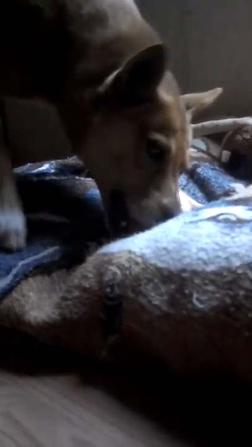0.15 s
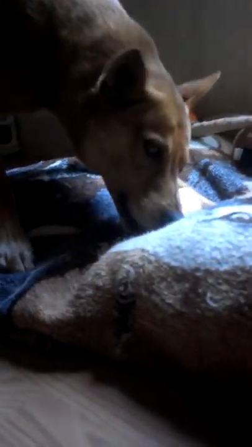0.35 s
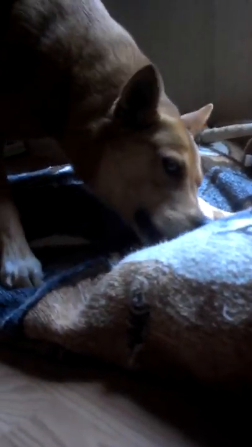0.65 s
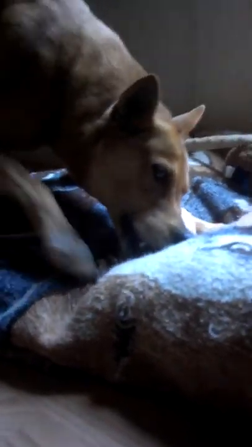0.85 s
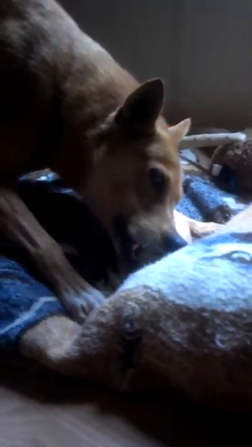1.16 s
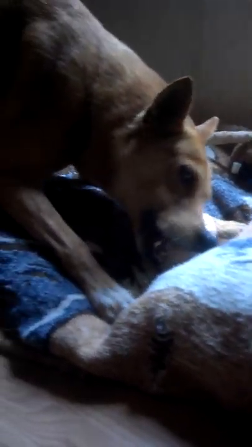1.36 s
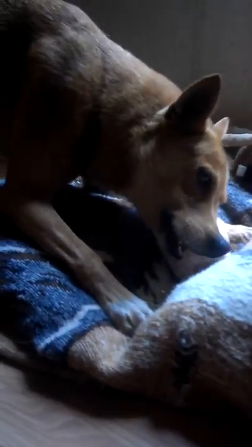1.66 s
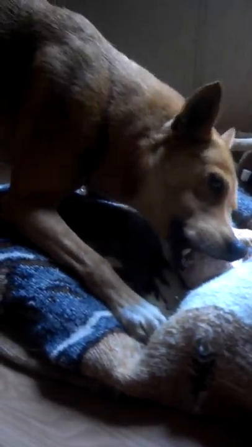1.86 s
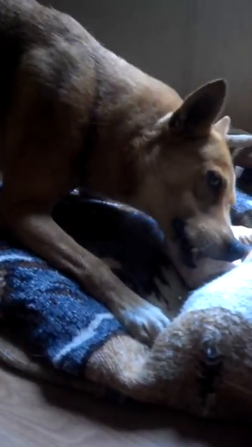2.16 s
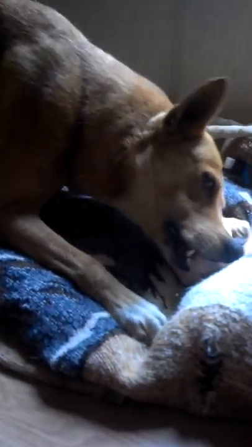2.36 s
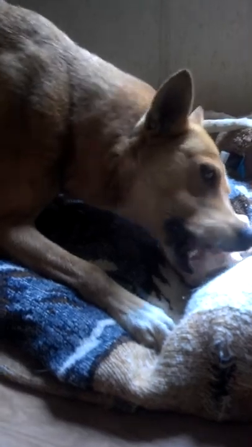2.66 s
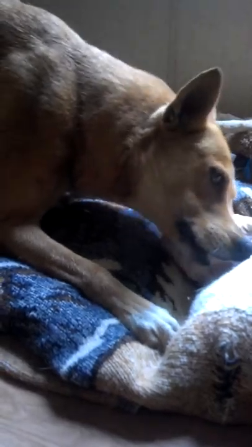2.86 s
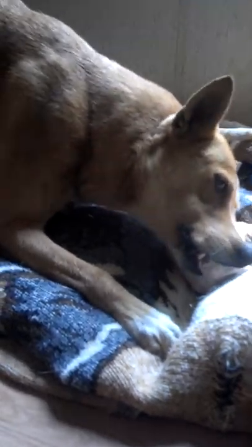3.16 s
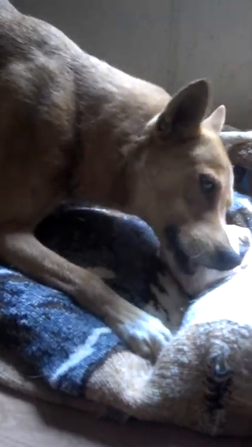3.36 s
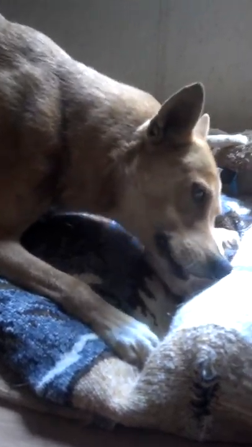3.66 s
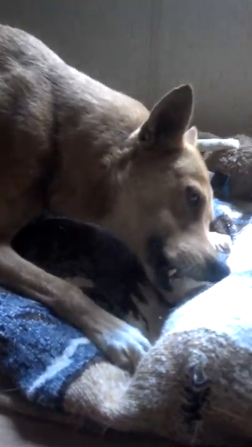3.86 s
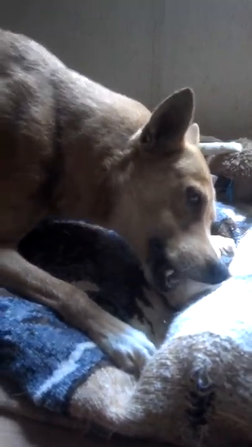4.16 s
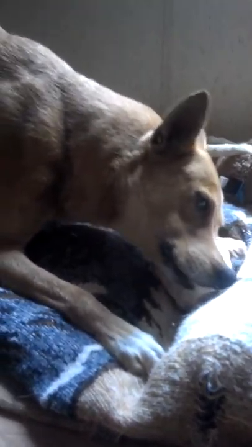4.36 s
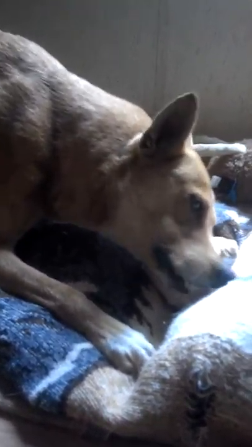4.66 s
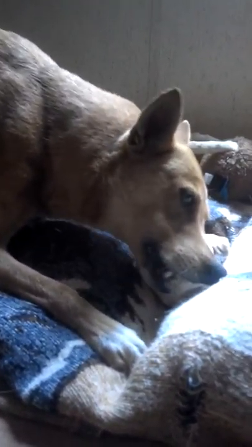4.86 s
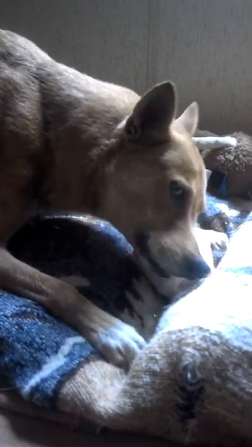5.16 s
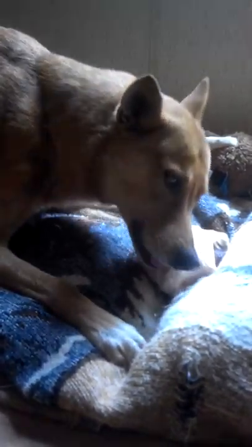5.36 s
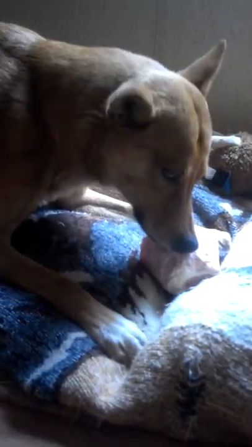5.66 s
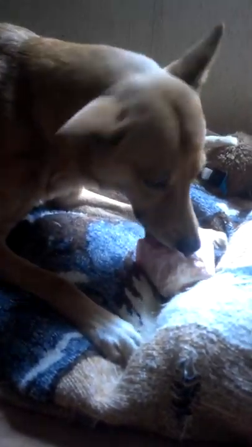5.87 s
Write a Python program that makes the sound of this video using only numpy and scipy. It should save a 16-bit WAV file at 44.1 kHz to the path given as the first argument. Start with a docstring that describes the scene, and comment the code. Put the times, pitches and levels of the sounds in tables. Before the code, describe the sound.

Sharp clicks and hollow knocks of a dog chewing a bone, with soft blanket rustling and an appliance humming in a quiet room.

```python
"""Under a dog's gnawing, a quiet room's steady rush runs throughout, with a humming appliance and
a rustling blanket. The dog chews a hard bone close to a small stereo recorder. Each bite is a burst
of tiny slips that knock the jaw, crack the bone and snap on the teeth. In between, the mouth
smacks, the teeth scrape and the lips part. When the loudest splinters snap off, a limiter
(an automatic volume control) turns everything down, then lets it creep back."""
import sys
import numpy as np
from scipy import signal
from scipy.fft import rfft, irfft
from scipy.io import wavfile
from scipy.ndimage import uniform_filter1d, minimum_filter1d

SR = 44100
rng = np.random.default_rng(int(sys.argv[2]) if len(sys.argv) > 2 else 0)


def wav_out(sig):
    """Save sig, one row per channel (or a flat mono array), as 16-bit PCM at SR to the path in sys.argv[1]."""
    wavfile.write(sys.argv[1], SR, np.round(np.clip(np.atleast_2d(sig).T, -1, 1) * 32767).astype(np.int16))


N = 265041
TIME, FREQS = np.arange(N) / SR, np.fft.rfftfreq(N, 1 / SR)

# steady rush and hiss of the room: (frequency [Hz], level [dB per Hz])
ROOM_RUSH = [(25, -104), (50, -90.5), (100, -75.5), (145, -68.5), (230, -71), (350, -75), (480, -75.5),
             (1100, -80), (2150, -87.5), (2750, -92.5), (4500, -89), (5800, -96.5), (7200, -84.5),
             (11000, -97.5), (16000, -100)]
# narrow bands of whirring noise: (pitch [Hz], width [Hz], level [dB])
WHIRRS = [(793, 47, -56), (1497, 30, -57), (578.4, 6.7, -58.5)]
# a low drone that swells, then fades: (time [s], level [dB])
DRONE_LEVELS = [(0, -56.5), (.6, -46), (1.4, -54), (2, -60), (6, -53)]
# tones of the mains hum: (pitch [Hz], level [dB])
MAINS_HUM = [(60, -73.5), (120, -46), (180, -53), (240, -57), (300, -60)]
# tone colour of rustling cloth: (frequency [Hz], gain [dB])
CLOTH_COLOUR = [(100, -51), (250, 3), (520, 7.5), (800, -4.5), (1400, -7), (2200, -2.5), (4000, -15.5),
                (9000, -26), (16000, -32)]
# the muzzle shoves into the cloth: (peak time [s], pitch [Hz], level [dB])
MUZZLE_SHOVES = [(.12, 440, -43.5), (.25, 425, -42.5), (.441, 436, -40), (.929, 430, -59), (3.04, 740, -42),
                 (3.14, 710, -39.5), (4.996, 580, -43), (5.302, 560, -46), (5.935, 495, -41.5)]
# teeth catch on the bone: (time [s], slip length [ms], knock level [dB], knock pitch [Hz],
# crack level [dB], crack pitch [Hz], snap level [dB], snap pitch [Hz])
TOOTH_CATCHES = [(0.057, .8, -54, 1050, -41.5, 3660, -49, 7500),
                 (0.8665, 1.8, -39, 1090, -37.5, 3120, -52, 7300),
                 (0.913, 0.52, -40, 1010, -51, 3400, -55, 7500),
                 (1.3052, 0.54, -45, 960, -40, 3500, -50, 7600),
                 (1.309, 1.3, -41, 690, -53, 3460, -43, 7900),
                 (1.314, 1.3, -44, 1040, -39, 3400, -45, 8400),
                 (1.3477, .5, -34.5, 1090, -42.5, 3280, -48, 7600),
                 (1.411, 1.5, -56, 1100, -44.5, 4000, -50, 7500),
                 (1.5717, 0.62, -18.5, 835, -31, 3660, -36.5, 7850),
                 (1.5827, 1.37, -18.5, 800, -28, 4250, -29, 7700),
                 (1.7523, .6, -57, 1100, -62, 3500, -40, 7900),
                 (1.762, 1.25, -40.5, 1150, -35.5, 3250, -40, 8200),
                 (1.767, 2.4, -49, 1190, -36, 3270, -32.5, 8000),
                 (1.795, .8, -35.5, 1040, -58, 3300, -58, 7500),
                 (1.862, 1.1, -61, 820, -63, 3600, -43, 7500),
                 (1.9595, 2.5, -35, 830, -44, 3920, -39, 7500),
                 (1.9625, 8.1, -22.5, 809, -31, 3840, -31.5, 7400),
                 (2.171, 2.9, -58, 855, -45, 4400, -40, 7900),
                 (2.182, 2.2, -64, 1255, -45, 3570, -35, 7100),
                 (2.1841, 1.4, -32.5, 1390, -34, 3670, -33, 6100),
                 (2.3543, .6, -33, 810, -43, 3600, -58, 7740),
                 (2.3618, 1.5, -40, 1150, -48, 3600, -47, 7800),
                 (2.3676, 0.92, -19, 1190, -34, 3580, -33, 8240),
                 (2.3781, 4.4, -25.5, 1470, -31, 3470, -31.5, 7850),
                 (2.3825, 5.8, -23.5, 813, -41, 3570, -35.5, 7800),
                 (2.585, 3.8, -41, 1150, -37.5, 4140, -36, 7950),
                 (2.5907, 0.63, -37.5, 1100, -48, 3400, -43, 7950),
                 (2.7335, 7.8, -31.5, 742, -43, 3540, -35.5, 7300),
                 (2.7375, 1.4, -36.5, 1400, -43, 3600, -45, 7260),
                 (3.1562, 1.4, -28, 777, -40.5, 3500, -36, 7600),
                 (3.1584, 5.2, -35.5, 1635, -33, 3500, -28, 8200),
                 (3.3927, 3.9, -45, 1100, -39, 4220, -37, 8400),
                 (3.529, 9.9, -31, 726, -37.5, 3650, -35.5, 8300),
                 (3.541, 1.2, -28.5, 740, -47, 3600, -36, 7750),
                 (3.5418, 3.5, -34, 1350, -40, 3600, -33.5, 7760),
                 (3.558, 0.8, -51, 1260, -38.5, 3000, -37, 6960),
                 (3.7535, 1.1, -47, 1050, -43, 3760, -36.5, 7000),
                 (3.761, 3.3, -40, 1080, -42, 3320, -49, 7500),
                 (3.9155, 7, -28.5, 748, -44.5, 3450, -43, 8200),
                 (4.2718, 1.6, -32, 780, -51, 3500, -49, 8100),
                 (4.274, 1.6, -40, 990, -43, 3480, -42.5, 8100),
                 (4.4955, 3.1, -55, 1200, -46, 3970, -33, 8700),
                 (4.4983, 2.1, -38, 1170, -63, 3900, -61, 8400),
                 (4.609, 6.4, -33, 810, -39, 3470, -41.5, 7200),
                 (4.6147, .8, -40, 1050, -59, 3500, -53, 7200), (4.701, 2, -46, 785, -58, 3500, -42, 7800),
                 (4.835, 1.5, -55, 1400, -52, 4120, -47, 6800),
                 (4.85, 3.2, -46, 1710, -56, 3300, -52, 8400),
                 (4.881, 2.7, -51, 1300, -56, 3300, -42, 7240),
                 (4.8945, 0.92, -40, 1140, -50, 3080, -45, 8300),
                 (5.4206, 1.5, -48, 1090, -41, 2960, -37, 7300),
                 (5.4235, 4.5, -54, 1210, -42.5, 3020, -38.5, 7600)]
# extra notes of the cracking bone: (pitch [Hz], width [Hz], level against the main note [dB])
BONE_NOTES = [(1603, 260, -5), (2005, 50, -9), (3470, 98, -18), (4440, 1300, -14.5)]
# splinters break off: (time [s], crack level [dB], snap level [dB], snap pitch [Hz])
SPLINTER_BREAKS = [(1.582, -30, -23.5, 7900), (2.1735, -51, -40, 8200), (2.1843, -29, -24.5, 7500),
                   (2.3788, -37, -34, 8300), (3.541, -38, -33.5, 7600), (3.9193, -42, -42, 8000),
                   (4.188, -51, -47, 9500), (4.4971, -39, -32.5, 8400), (4.8948, -48, -40, 8300),
                   (5.4207, -45, -42, 8000)]
# teeth drag along the bone: (peak time [s], pitch [Hz], level [dB])
TOOTH_SCRAPES = [(2.425, 8500, -44), (3.57, 3200, -52), (3.815, 7400, -49.5), (4.125, 7340, -49),
                 (4.885, 1920, -53), (5.45, 3120, -52), (5.94, 3640, -53), (5.945, 7540, -49.5)]
# bubbles burst as wet lips part: (time [s], pitch [Hz], level [dB])
LIP_BUBBLES = [(2.957, 6430, -39.5), (4.188, 7100, -49), (4.425, 4450, -46.5), (4.702, 8000, -35),
               (4.836, 6600, -34.5), (4.849, 8400, -42), (4.876, 6600, -38.5)]
# how long the room echoes: (frequency [Hz], time to fade by 60 dB [s])
ROOM_DECAY = [(200, 0.083), (850, 0.19), (2000, 0.36), (8000, 0.33), (15000, 0.058)]
# the two microphone openings, or ports: (frequency [Hz], likeness [0-1], left lead [radians])
MIC_PORTS = [(131, 1, 1.73), (262, 0.92, 1.5), (370, 0.7, 1.6), (545, 0.66, 0.07), (825, 0.84, 0.64),
             (1330, 1, -1), (1650, 0.68, -1.1), (2075, 0.72, -2), (2330, 1, -3.05), (2580, 1, -3.2),
             (2800, .45, -4.2), (3280, 0.97, -5.5), (3830, 1, -5.5), (4200, 0.4, -8), (4780, 0.83, -9.5),
             (5570, 0, -10), (7160, 1, -14.5), (8120, 0.58, -19), (10200, 0.18, -15.5), (13200, 0.1, -20.5)]
# level difference between the ports: (frequency [Hz], left minus right [dB])
PORT_BALANCE = [(120, -3), (300, 1), (900, 0.5), (1400, -0.5), (1750, -1), (2330, 0), (2600, 0), (3500, -1),
                (4400, -2), (6000, -0.5), (8000, 3.5), (12500, -2.5)]

APPROACH_S = .008  # a tooth touches the bone this long before it catches
GRIP_SHARE = 0.76  # the tooth keeps its grip for this share of a slip


def amp(db):
    """Turns decibels into a multiplier."""
    return 10 ** (np.asarray(db) / 20)


def unit(x):
    """Scales a sound to an average (rms) level of 1."""
    return x / np.sqrt(np.mean(x ** 2) + 1e-20)


def read(points, hz, column=1):
    """Reads between a table's rows on a log-frequency axis."""
    table = np.array(points, float)
    return np.interp(np.log(hz + 1), np.log(table[:, 0] + 1), table[:, column])


def add(mix, start_s, sound):
    """Adds a sound into the mix at a given time."""
    part = mix[..., round(start_s * SR):][..., :sound.shape[-1]]
    part += sound[..., :part.shape[-1]]


def colour(x, points):
    """Turns each frequency up or down as a table says."""
    return irfft(rfft(x) * amp(read(points, FREQS)), N)


def ring(x, hz, width_hz):
    """One resonance: the narrower it is, the longer it rings."""
    return signal.lfilter(*signal.iirpeak(hz, hz / width_hz, SR), x)


def double_ring(x, hz, width_hz, widen=2):
    """A resonance, then a wider one that trims its edges."""
    return ring(ring(x, hz, width_hz), hz, widen * width_hz)


def drift(per_s):
    """A slow random wobble of size 1."""
    return unit(irfft(rfft(rng.standard_normal(N)) * np.exp(-(FREQS / per_s) ** 2), N))


def burst(x, db):
    """Scales a short sound to a level taken over 5 ms."""
    return amp(db) * x / np.sqrt(np.mean(np.sum(x ** 2, -1)) / (SR / 200) + 1e-20)


def strokes(rows, length_s, width_share, grain_db):
    """Short swells of grainy rubbing, each around one pitch."""
    out, swell = np.zeros((2, N)), signal.windows.hann(round(length_s * SR))
    for s, hz, db in rows:
        grains = rng.standard_normal((2, SR // 2)) * amp(grain_db * rng.standard_normal(SR // 2))
        rubbed = unit(double_ring(grains, hz, width_share * hz))
        add(out, max(s - length_s / 2, 0), amp(db) * swell * rubbed[:, :len(swell)])
    return out


def appliance(drone_hz=259, drone_width_hz=14):
    """An appliance whirrs, drones and hums over the room's rush."""
    out = colour(rng.standard_normal((2, N)) * np.sqrt(SR / 2), ROOM_RUSH)
    for hz, width, db in WHIRRS:
        out += amp(db) * unit(ring(rng.standard_normal((2, N)), hz, width))
    drone = double_ring(rng.standard_normal((2, N)), drone_hz, drone_width_hz)
    out += unit(drone) * amp(np.interp(TIME, *np.transpose(DRONE_LEVELS)))
    for hz, db in MAINS_HUM:
        out[0] += amp(db) * np.sqrt(2) * np.sin(2 * np.pi * (hz * TIME + rng.random()))
    return out


def blanket(rub_db=-49.5, sway_db=0.46, flutter_db=3.5):
    """Fibres catch and let go under muzzle and paws; each shove gives a soft hollow swell."""
    rub = amp(rub_db + sway_db * drift(3) + flutter_db * drift(25))
    rustle = unit(colour(rng.standard_normal((2, N)), CLOTH_COLOUR))
    return rustle * rub + strokes(MUZZLE_SHOVES, length_s=.12, width_share=0.74, grain_db=2.0)


def smacks(per_s=70, level_db=-62, spread_db=4, pitches=8):
    """Films of saliva burst as faint ticks of many pitches."""
    out = np.zeros((2, N))
    for hz in np.geomspace(1300, 9000, pitches):
        pops = rng.random(N) < per_s / pitches / SR
        sizes = amp(spread_db * np.minimum(rng.exponential(1, N), 2))
        out += unit(ring(pops * sizes * rng.choice([-1, 1], (2, N)), hz, 0.11 * hz))
    return amp(level_db) * unit(out)


def gnawing():
    """Each catch of a tooth gives a low knock and a bright crunch."""
    knocks, crunches = np.zeros(N), np.zeros((2, N))
    for s, length_ms, knock_db, knock_hz, *crack_and_snap in TOOTH_CATCHES:
        add(knocks, s, knock(length_ms, knock_db, knock_hz))
        add(crunches, s - APPROACH_S, crunch(length_ms, *crack_and_snap))
    return knocks, crunches


def crunch(length_ms, crack_db, crack_hz, snap_db, snap_hz,
           drag_db=-13, drag_ms=3, fade_ms=0.96, crumble_db=-19, crumble_ms=5, tick_db=-17):
    """Grit breaks under the tooth: the bone cracks and the tooth's hard enamel snaps."""
    ms = (np.arange(2560) / SR - APPROACH_S) * 1000
    # the tooth drags lightly, grips and lets go; crumbs break off just after
    drag = amp(drag_db) * np.exp(np.minimum(ms, 0) / drag_ms)
    grip = np.maximum(np.clip(ms / (0.25 * length_ms), 0, 1), drag)
    after_ms = np.maximum(ms - GRIP_SHARE * length_ms, 0)
    release = np.exp(-after_ms / fade_ms) + amp(crumble_db) * np.exp(-after_ms / crumble_ms)
    grains = rng.standard_normal((2, len(ms))) * amp(2.8 * rng.standard_normal(len(ms)))
    grit = grip * release * grains
    notes = [(crack_hz, 1100, 0), *BONE_NOTES]
    crack = sum(burst(double_ring(grit, hz, width, widen=3), crack_db + db) for hz, width, db in notes)
    # enamel gives a bright ping and a tick far above it
    ping = double_ring(grit, snap_hz, width_hz=2800)
    tick = ring(np.diff(grit, prepend=0), hz=13500, width_hz=6000)
    return crack + burst(ping + amp(tick_db) * tick, snap_db)


def knock(length_ms, db, hz, spread_db=3, thud_db=-7, flesh_hz=1750, bass_cut_hz=520):
    """A tooth sticks and slips in step with the ringing jaw and bone, building a hollow note."""
    t = np.arange(2048) / SR
    gripping = t * 1000 <= GRIP_SHARE * length_ms
    slips = np.diff(np.floor(hz * t), prepend=-1) * gripping  # one per cycle
    slips *= amp(spread_db * rng.standard_normal(len(t)))
    # flesh softens each slip, and so small a body gives little bass
    thud = signal.lfilter(*signal.butter(4, flesh_hz, fs=SR), -slips)
    thud = signal.lfilter(*signal.butter(2, bass_cut_hz, "highpass", fs=SR), thud)
    note = ring(thud, hz, width_hz=135 * (hz / 850) ** 4.2)  # higher notes die sooner
    return burst(unit(note) + amp(thud_db) * unit(thud), db)


def hollow_ring(hz=836, fade_s=.29, rise_s=.006, ring_db=-12.5, reach_hz=40):
    """A knock close to the pitch of the hollow bone sets it ringing on."""
    t, energy = np.arange(SR // 4) / SR, np.zeros(N)
    fade, rise = amp(-60 * t / fade_s), 1 - np.exp(-t / rise_s)
    for s, _, knock_db, knock_hz, *_ in TOOTH_CATCHES:
        push = amp(knock_db + ring_db) / (1 + ((knock_hz - hz) / reach_hz) ** 2)
        add(energy, s, (push * fade) ** 2 * rise)
    return np.sqrt(2 * energy) * np.sin(2 * np.pi * (hz * TIME + rng.random()))


def splinters(tick_db=-14):
    """One sudden break rings the bone and the enamel for an instant."""
    out, jolt = np.zeros(N), signal.unit_impulse(512)
    crack = double_ring(jolt, hz=3550, width_hz=750, widen=3)
    tick = ring(np.diff(jolt, prepend=0), hz=15200, width_hz=5000)
    for s, crack_db, snap_db, snap_hz in SPLINTER_BREAKS:
        snap = double_ring(jolt, snap_hz, width_hz=2700)
        add(out, s, burst(crack, crack_db) + burst(snap, snap_db) + burst(tick, snap_db + tick_db))
    return out


def scrapes():
    """Teeth drag lightly along the bone with a thin, grainy rasp."""
    return strokes(TOOTH_SCRAPES, length_s=0.084, width_share=0.42, grain_db=6.5)


def lips(glide=0.032, roughness=0.11, fade_s=.0004):
    """Wet lips part: each bubble swells and dies in a few milliseconds while its pitch rises."""
    out, age = np.zeros((2, N)), np.arange(512) / SR / fade_s
    for s, hz, db in LIP_BUBBLES:
        cycles = np.cumsum(hz * (1 + glide * (np.minimum(age, 6) - 2))) / SR
        ping = np.sin(2 * np.pi * (cycles + rng.random((2, 1))))
        ping += roughness * rng.standard_normal((2, len(age)))
        add(out, s, burst(ping * age ** 2 * np.exp(-age), db))
    return out


def room(x, echo_db=-7.0, build_s=0.0029, echoes_per_s=3000):
    """Echoes build up, then each frequency fades at its own speed."""
    t = np.arange(SR // 2) / SR
    echoes = rng.standard_normal((2, len(t))) * (rng.random((2, len(t))) < echoes_per_s / SR)
    echoes *= np.minimum(t / build_s, 1)
    hz, age_s, bands = signal.stft(echoes, SR, nperseg=256)
    fade = amp(-60 * age_s / read(ROOM_DECAY, hz)[:, None])
    tail = signal.istft(bands * fade, SR, nperseg=256)[1]
    return amp(echo_db) * signal.fftconvolve(x[None], tail / np.linalg.norm(tail[0]), axes=1)[:, :N]


def ports(versions):
    """Blends two versions of a sound into left and right; a single one only shifts in phase."""
    left, other = rfft(versions[0]), rfft(versions[-1])
    likeness = np.clip(read(MIC_PORTS, FREQS, column=1), 0, 1) if len(versions) > 1 else 1
    right = likeness * left + np.sqrt(1 - likeness ** 2) * other
    right *= np.exp(-1j * read(MIC_PORTS, FREQS, column=2))
    return irfft(np.array([left, right]), N)


def scene(bright_echo_db=-4):
    """Bites and mouth sounds up close, their room echo, and the steady background."""
    knocks, crunches = gnawing()
    snaps = splinters()
    mouth = crunches + lips() + smacks() + scrapes()
    echo = room(knocks + amp(bright_echo_db) * (mouth[0] + snaps))  # the bedding soaks up treble
    return ports([knocks + snaps + hollow_ring()]) + ports(mouth + echo + blanket() + appliance())


def record(dry, sense_hz=3000, limit_db=-20.5, creep_db_per_s=10.5, top_hz=15650):
    """The ports colour each side; a limiter ducks at once on sharp treble peaks and creeps back."""
    balance_db = read(PORT_BALANCE, FREQS) * np.array([[.5], [-.5]])
    sound = irfft(rfft(dry) * amp(balance_db), N)
    treble = signal.lfilter(*signal.butter(2, sense_hz, "highpass", fs=SR), sound)
    treble_db = 10 * np.log10(abs(uniform_filter1d((treble ** 2).mean(0), size=22)) + 1e-12)
    over_db = np.maximum(-minimum_filter1d(limit_db - treble_db, size=45), 0)
    creep_db = creep_db_per_s * TIME
    duck_db = np.maximum.accumulate(over_db + creep_db) - creep_db
    sound *= amp(-uniform_filter1d(duck_db, size=33))
    top_cut = signal.firwin(401, top_hz, window=("kaiser", 9), fs=SR)  # removes the highest treble
    return signal.oaconvolve(sound, top_cut[None], "same")


dry = scene()
out = record(dry)
wav_out(out)
```